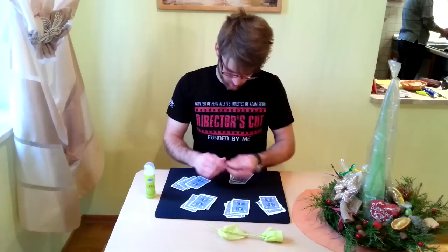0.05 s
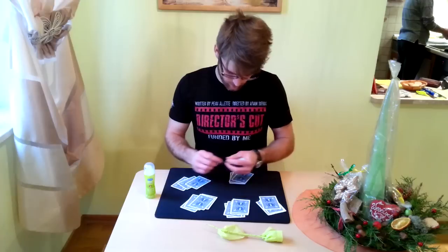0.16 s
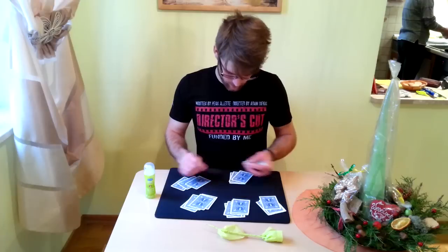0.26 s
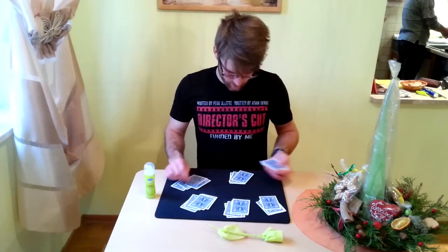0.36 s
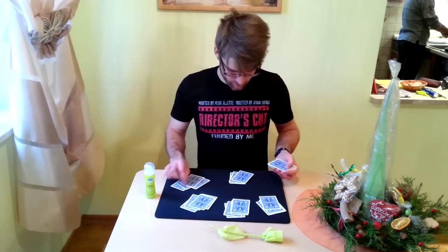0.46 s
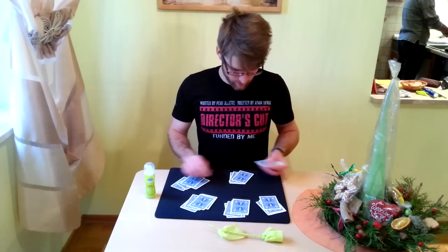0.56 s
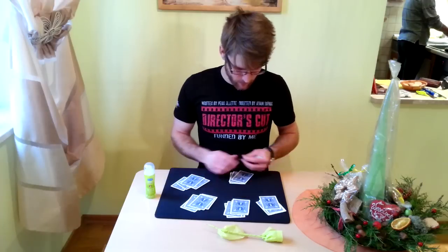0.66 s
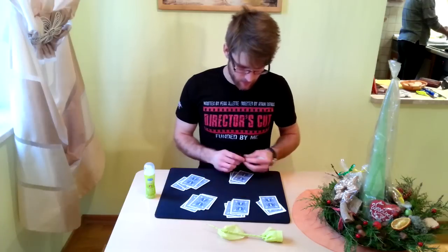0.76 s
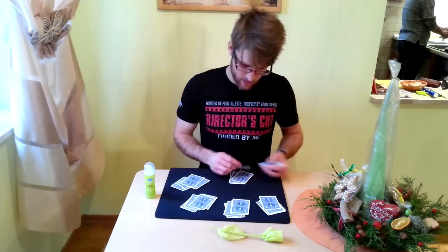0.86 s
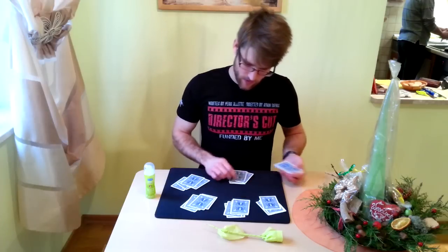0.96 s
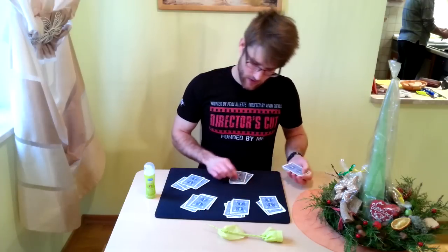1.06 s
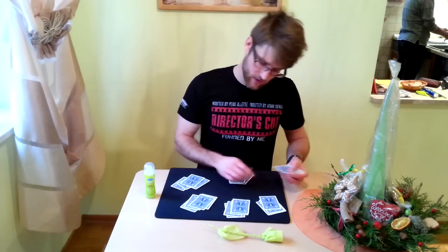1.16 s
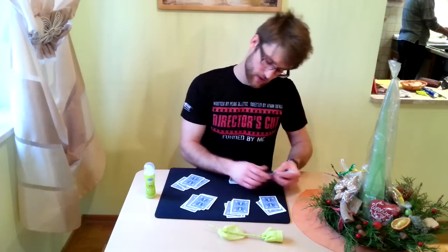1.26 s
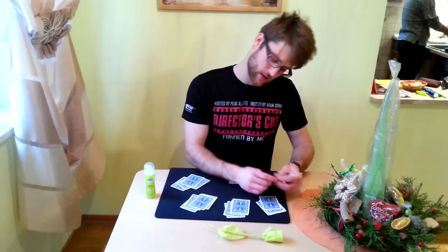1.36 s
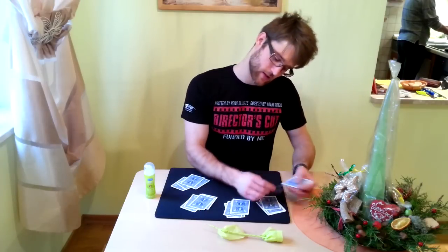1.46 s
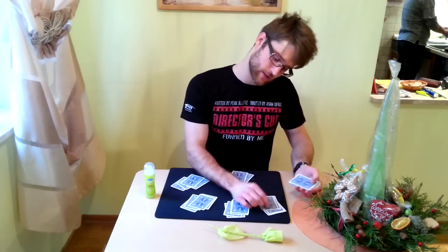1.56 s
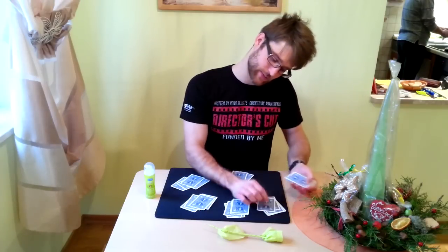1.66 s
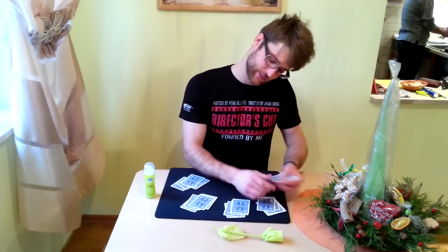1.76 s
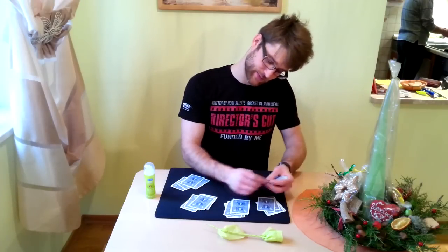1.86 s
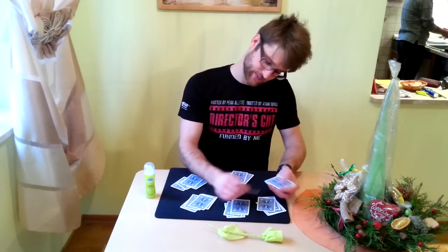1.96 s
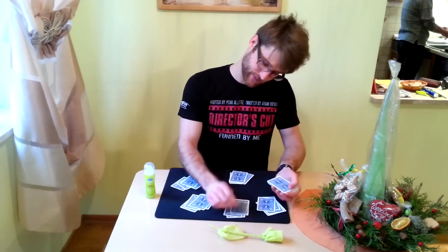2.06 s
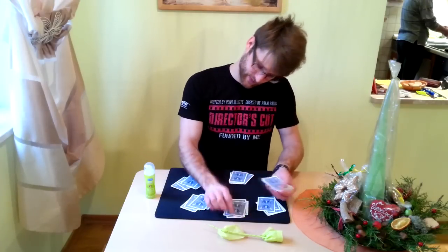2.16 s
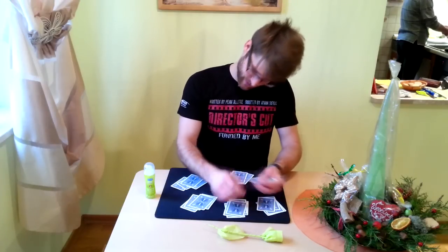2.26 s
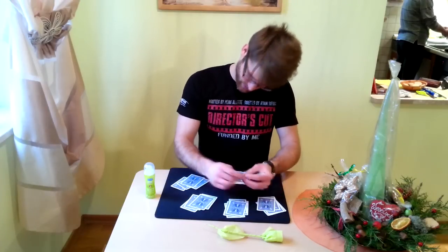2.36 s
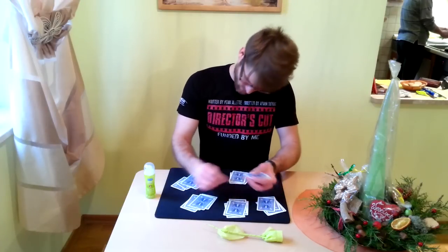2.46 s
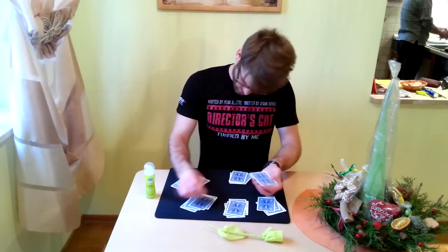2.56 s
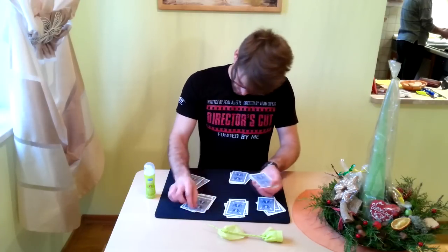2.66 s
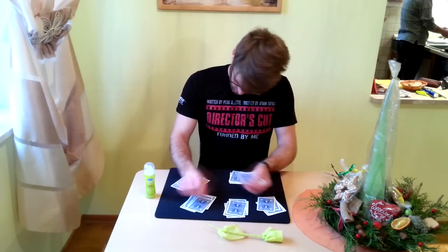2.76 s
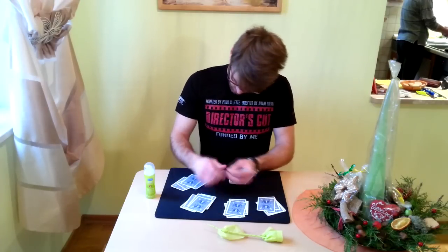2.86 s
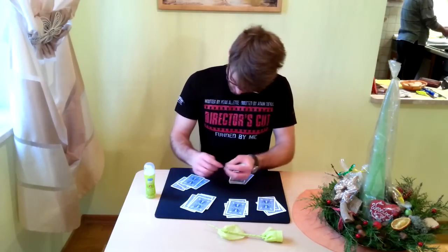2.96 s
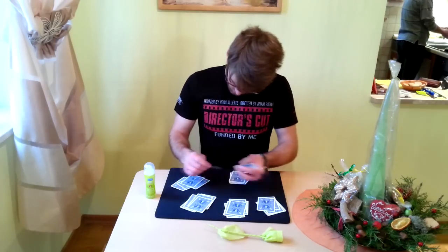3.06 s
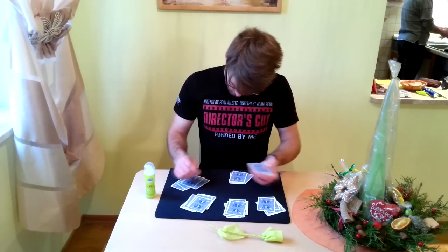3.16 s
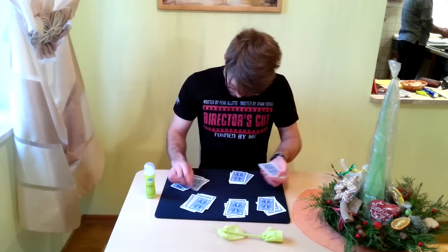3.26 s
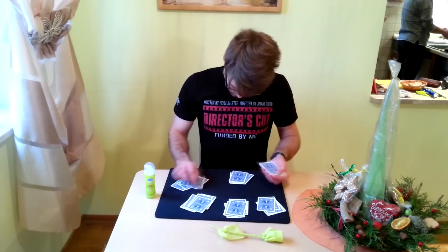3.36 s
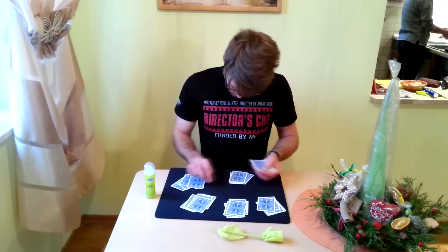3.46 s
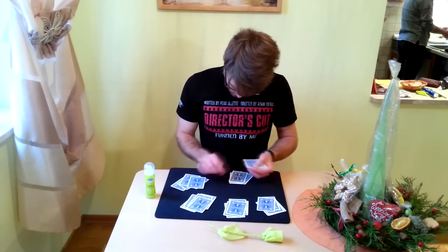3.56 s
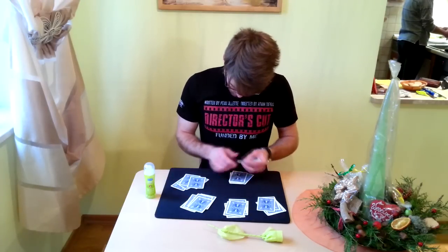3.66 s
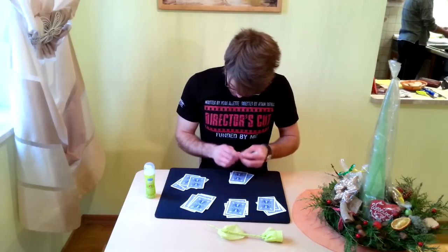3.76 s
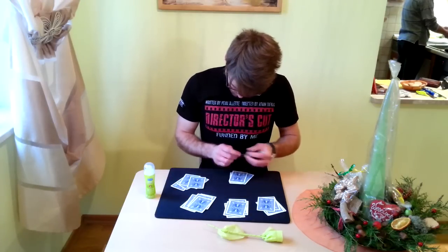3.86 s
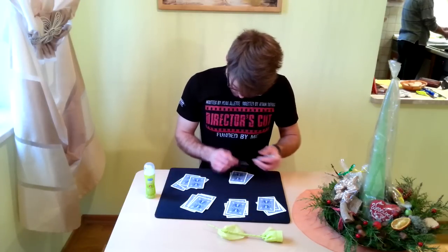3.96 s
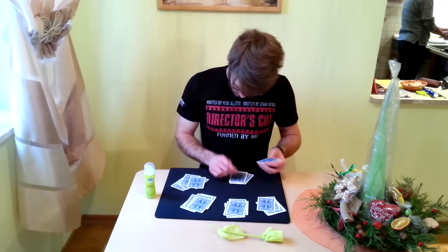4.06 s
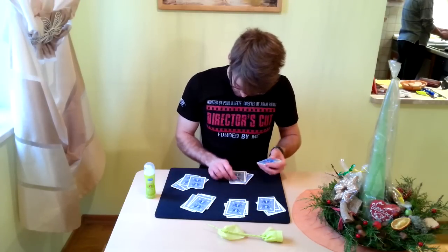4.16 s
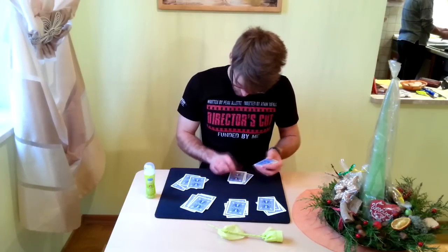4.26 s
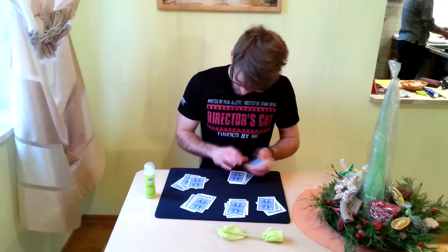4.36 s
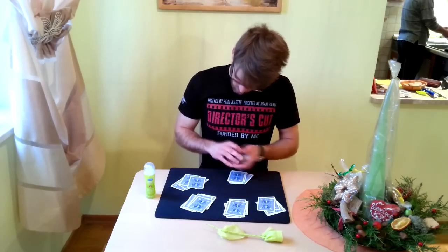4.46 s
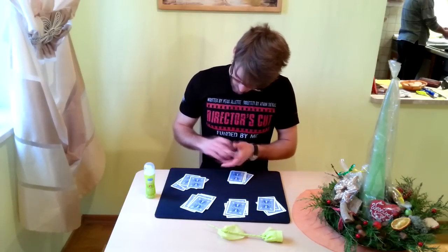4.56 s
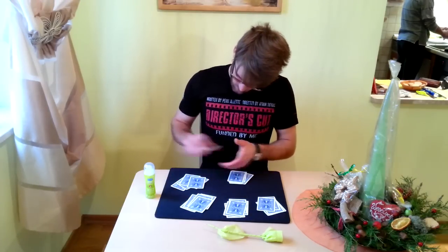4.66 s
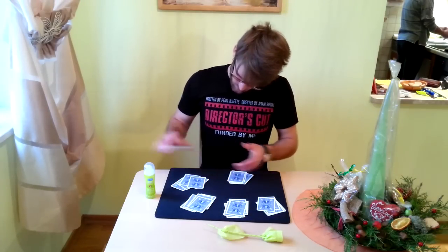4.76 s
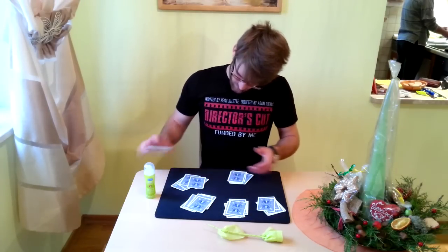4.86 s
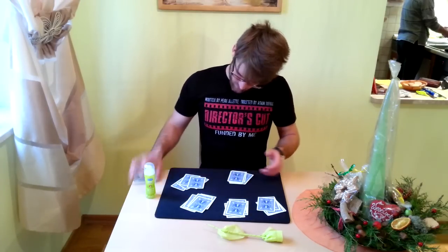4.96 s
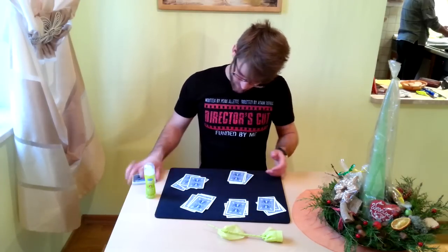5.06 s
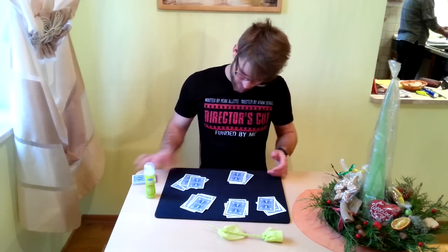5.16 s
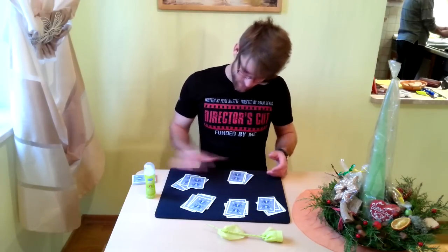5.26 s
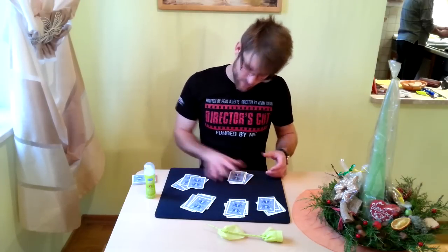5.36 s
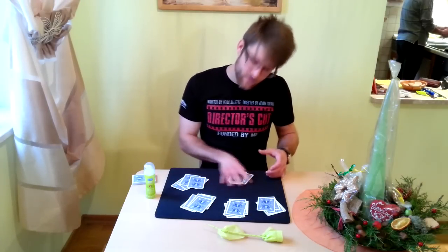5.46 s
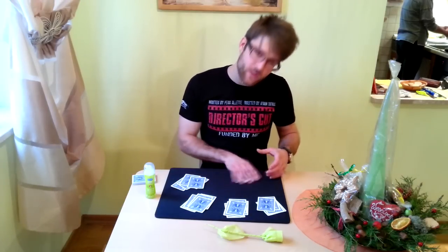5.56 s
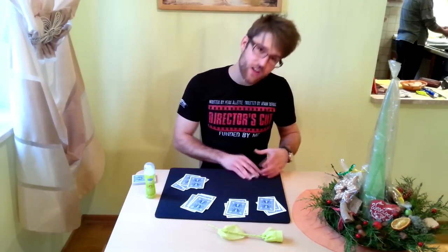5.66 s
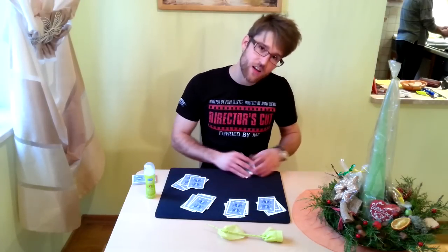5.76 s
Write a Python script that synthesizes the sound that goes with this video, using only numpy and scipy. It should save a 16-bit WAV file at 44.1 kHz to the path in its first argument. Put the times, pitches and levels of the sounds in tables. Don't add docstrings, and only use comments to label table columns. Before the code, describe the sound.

Someone deals playing cards onto a soft mat on a table, each landing with a short papery snap and sometimes a dull thud. Sliding cards and sleeves rustle faintly between deals. After the last crisp snap, the remaining deck is knocked on bare wood, by far the loudest sound, with a card slap and short ring. A spaced stereo microphone pair a few steps away hears a small, lively room.

```python
import sys
import numpy as np
from scipy import signal
from scipy.io import wavfile

SR = 44100
rng = np.random.default_rng(int(sys.argv[2]) if len(sys.argv) > 2 else 0)


def master_out(mix):
    frames = np.transpose(np.atleast_2d(mix))
    ceiling = np.clip(frames, -1, 1)
    pcm = np.round(ceiling * 32767).astype(np.int16)
    wavfile.write(sys.argv[1], SR, pcm)


def convert_level_to_amplitude(level_db):
    exponent = np.asarray(level_db, float) / 20
    return 10 ** exponent


N = 255778
PRE_S = 0.008

# (t/s, peak/dB, card pitch f/Hz, mat thud level/dB, edge crack level/dB)
SNAPS = [
    (0.4887, -33.5, 1204, -5.5, 5.5),
    (1.066, -25, 1400, -24, 5.5),
    (1.663, -23.5, 1415, -2, 2.5),
    (2.1993, -23.5, 1226, -44, 1),
    (2.7319, -33, 880, -3, 8.5),
    (3.453, -43.5, 1570, 2, -1),
    (3.463, -38, 1050, -2.5, 8),
    (3.494, -49, 1080, 1.5, 18),
    (4.2575, -23, 1320, -8, 6.5),
]


def rms_one(x):
    return x / np.sqrt(np.mean(x ** 2) + 1e-20)


def peak_one(x):
    return x / np.max(np.abs(x))


def at_hz(points, hz):
    points_hz, values = np.array(points)[:, 0], np.array(points)[:, 1]
    return np.interp(np.log(hz), np.log(points_hz), values)


def drift(rate_hz):
    knots = rng.standard_normal(int(N / SR * rate_hz) + 3)
    return np.interp(np.arange(N) / SR * rate_hz, np.arange(len(knots)), knots)


def peak(x, hz, width_hz):
    r = np.exp(-np.pi * np.clip(width_hz, 2, 9000) / SR)
    feedback = [1, -2 * r * np.cos(2 * np.pi * hz / SR), r * r]
    return signal.lfilter([(1 - r * r) / 2, 0, (r * r - 1) / 2], feedback, x)


def twice(x, hz, width_hz):
    return peak_one(peak(peak(x, hz, width_hz), hz, width_hz))


def bands(size):
    # (f/Hz, likeness)
    likeness = [(25, 0.34), (70, 0.16), (125, 0.41), (300, 0.58), (600, 0.64), (1200, 0.14), (15000, 0.089)]
    edges_hz = 20 * 2 ** np.arange(0, 9.7, .4)
    white = rng.standard_normal((2, 2, size))
    for k, (low, high) in enumerate(zip(edges_hz, edges_hz[1:])):
        band_pass = signal.butter(2, [low, high], "band", fs=SR, output="sos")
        mid, side = signal.sosfilt(band_pass, white[k % 2])
        hz = np.sqrt(low * high)
        alike = np.clip(at_hz(likeness, hz), -1, 1)
        common = np.sqrt(1 + alike) * mid
        opposed = np.sqrt(1 - alike) * side * [[1], [-1]]
        yield hz, (common + opposed) / np.sqrt(2)


def rustle(follows, settle_db, settle_db_per_s):
    # (t/s, level/dB)
    busy = [(0, -52), (.09, -65), (.45, -63.5), (.95, -58.5), (1.25, -62), (1.5, -57), (1.82, -51),
            (2.15, -55), (2.45, -56.5), (2.65, -62), (2.95, -57), (3.2, -66.5), (3.8, -66.5), (4.0, -58),
            (4.65, -61.5), (4.95, -67.5), (5.42, -63), (5.66, -52.5)]
    mean_busy_db = -62
    t = np.arange(N) / SR
    swing_db = np.interp(t, *np.transpose(busy)) - mean_busy_db
    power = convert_level_to_amplitude(mean_busy_db + follows * swing_db) ** 2
    for s, db, *_ in SNAPS:
        start = round(s * SR)
        power[start:] += convert_level_to_amplitude(db + settle_db - settle_db_per_s * (t[start:] - s)) ** 2
    return np.sqrt(power)


def background():
    # (f/Hz, level/dB per Hz)
    slide_spectrum = [(1200, -67.5), (2200, 0), (3200, -3), (4200, 1), (5500, -24.5), (7000, -18)]
    sleeve_spectrum = [(150, -6), (300, -2), (600, -1.5), (1200, -1), (2200, -5), (3500, -46.5)]
    hiss_spectrum = [(4000, -2), (6000, -1.5), (9000, 0.5), (14000, -7)]
    # (f/Hz, level/dB per Hz)
    air_spectrum = [(20, -14), (60, -17), (160, -6), (280, -4.5), (400, -12.5), (1000, -17.5), (5000, -32),
                    (15000, -23)]
    # (f/Hz, width/Hz, level/dB)
    hum = (249, 24, -71)
    air_db = -55.5
    slide = rustle(follows=0.95, settle_db=-13.5, settle_db_per_s=136)
    sleeve = rustle(follows=0.83, settle_db=-21, settle_db_per_s=70)
    hiss = rustle(follows=0.55, settle_db=-22.5, settle_db_per_s=118)
    out, together = 0, drift(42)
    for hz, noise in bands(N):
        moving = (slide * convert_level_to_amplitude(at_hz(slide_spectrum, hz) + 11.5)) ** 2
        moving = moving + (sleeve * convert_level_to_amplitude(at_hz(sleeve_spectrum, hz) + 13.5)) ** 2
        moving = moving + (hiss * convert_level_to_amplitude(at_hz(hiss_spectrum, hz) + 2.5)) ** 2 * (hz > 3000)
        moving = moving * convert_level_to_amplitude(2.0 * together + 4.6 * drift(15)) * (hz > 120)
        still = convert_level_to_amplitude(air_db + at_hz(air_spectrum, hz) + 17.5) ** 2
        out = out + noise * np.sqrt(moving + still)
    hz, width_hz, db = hum
    return out + convert_level_to_amplitude(db) * rms_one(peak(rng.standard_normal(N), hz, width_hz))


def burst(length_s, grain=0.23, lead_s=0.0054):
    t = np.arange(-PRE_S, .15, 1 / SR)
    grains = rng.standard_normal(len(t)) * convert_level_to_amplitude(4.0 * rng.standard_normal(len(t)))
    out = grain * grains * np.exp(np.where(t < 0, t / lead_s - .7, -t / max(length_s, 1e-4)))
    out[np.argmax(t >= 0)] = 1.5
    return out


def add(track, s, sound):
    i = round((s - PRE_S) * SR)
    track[..., i:i + sound.shape[-1]] += sound[..., :N - i]


def touches():
    # (t/s, peak/dB, f/Hz,
    # length/s)
    edge_catches = [(0.386, -49.5, 604, .002), (0.701, -49.5, 3770, .006), (0.707, -49, 1640, 0.0037),
                    (0.767, -43, 3700, 0.0071), (.9792, -44.5, 2760, 0.0018), (1.594, -51.5, 446, 0.0041),
                    (2.1, -53.5, 840, 0.0056), (2.526, -48, 1050, .0034), (2.67, -58, 890, .0036),
                    (2.735, -49.5, 297, 0.039), (4.2578, -31, 2640, 0.0047), (3.464, -55, 330, 0.0043),
                    (3.896, -45, 3860, 0.025), (4.115, -56, 1410, .0036), (4.26, -34, 790, 0.0098),
                    (4.623, -50.5, 8500, 0.017), (4.683, -40, 3780, 0.0025)]
    # (t/s, peak/dB, centre f/Hz, length/s)
    face_brushes = [(.257, -51, 530, 0.0093), (.408, -58.5, 466, 0.013), (1.665, -30.5, 2640, 0.014),
                    (2.423, -46, 2500, 0.012), (2.5262, -41, 2640, 0.0017), (2.738, -33, 3450, 0.034),
                    (3.002, -55, 1800, .003), (3.019, -43, 1250, 0.012), (3.03, -44.5, 3420, 0.029),
                    (3.281, -47, 1820, 0.0035), (4.562, -44.5, 2800, 0.0076), (5.585, -52, 9050, .002),
                    (5.707, -42, 5400, 0.0016)]
    out = np.zeros(N)
    for rows, width_share in ((edge_catches, .42), (face_brushes, 1.47)):
        for s, db, hz, length_s in rows:
            hit = burst(length_s, grain=.1, lead_s=.0003)
            scuff = twice(hit, hz, width_share * hz)
            tick_db = -9 + 7.5 * np.log2(hz / 2000)
            tick = peak_one(peak(hit, 4800, 9900))
            add(out, s, convert_level_to_amplitude(db) * (scuff + convert_level_to_amplitude(tick_db) * tick))
    return out


def snaps():
    out = np.zeros(N)
    for s, db, hz, thud_db, crack_db in SNAPS:
        hit = burst(0.0015, grain=.09, lead_s=.0012)
        thud_hz = 0.57 * hz
        crack = peak_one(peak(hit, 2590, 3600) + 0.14 * peak(hit, 8200, 8900))
        card = peak_one(peak(twice(hit, hz, 0.86 * hz), hz, 2.2 * hz))
        thud = twice(hit, thud_hz, 1.53 * thud_hz)
        add(out, s, convert_level_to_amplitude(db) * (card + convert_level_to_amplitude(thud_db) * thud + convert_level_to_amplitude(crack_db) * crack))
    left_right_db = np.array([[-.1], [.1]])
    return out * convert_level_to_amplitude(left_right_db)


def knock():
    # (t/s, wood level/dB, card slap level/dB, length/s)
    contacts = [
        (5.0603, -35, -21, 0.0036),
        (5.0679, -20.5, 0, 0.01),
        (5.0741, -5.5, -38, 0.0058),
        (5.082, -13.5, -20, 0.028),
        (5.179, -26.5, -62, 0.034),
        (5.285, -35, -37, 0.033),
    ]
    # (f/Hz, level/dB, t60/s)
    table_modes = [(172, 4, 0.083), (250.8, -9, 0.42), (299.4, -6, 0.31), (362, -8, 0.17), (408.4, 4, 0.2),
                   (463, -8, 0.18), (488, 10, 0.18), (547, 9.5, 0.05), (750, 4.5, 0.1), (869, 9, 0.064),
                   (980, 20.5, 0.025), (1060, -6, 0.031), (1320, -5, 0.03), (1950, 8, 0.028)]
    # (f/Hz, width/Hz, level/dB)
    deck_modes = [(3470, 1100, 0), (4100, 250, 6), (1050, 1200, 5.5), (2500, 1400, -5), (7100, 790, -11.5),
                  (9900, 1400, -18)]
    # (f/Hz, width/Hz, share lost)
    shadow = (8400, 11000, 1)
    wood, slap = np.zeros((2, N)), np.zeros(N)
    lags = (rng.random(len(table_modes)) * 12).astype(int)
    leans_db = 2.0 * rng.standard_normal(len(table_modes))
    for s, wood_db, slap_db, length_s in contacts:
        hit = np.pad(burst(length_s, grain=0.4, lead_s=0.00041), (0, SR // 2))
        modes = [convert_level_to_amplitude(db) * t60 * peak(hit, hz, 2.2 / t60) for hz, db, t60 in table_modes]
        left = sum(modes)
        right = sum(convert_level_to_amplitude(lean) * np.roll(mode, lag) for mode, lag, lean in zip(modes, lags, leans_db))
        add(wood, s, convert_level_to_amplitude(wood_db) * peak_one(np.array([left, right])))
        cards = sum(convert_level_to_amplitude(db) * peak(hit, hz, width_hz) for hz, width_hz, db in deck_modes)
        add(slap, s, convert_level_to_amplitude(slap_db) * peak_one(cards))
    hz, width_hz, share = shadow
    return wood, np.array([slap - share * peak(slap, hz, width_hz), slap])


def room(x):
    # (f/Hz, t60/s)
    tail_t60 = [(100, 0.66), (300, 0.64), (1000, 0.54), (3000, 0.54), (6000, 0.38), (12000, 0.28)]
    # (f/Hz, level/dB)
    tail_db = [(100, -27.5), (500, -20), (2000, -24.5), (6000, -23.5), (14000, -27.5)]
    # (t/s, left level/dB, right level/dB)
    wall_echoes = [
        (.0047, -2, -1),
        (.0078, -9, -8),
        (.0135, -10, -11),
    ]
    # (level/dB, t60/s)
    early = (5, .08)
    direct_db = 4
    t = np.arange(SR) / SR
    early_db, early_t60_s = early
    rise = np.clip((t - .002) / 0.0016, 0, 1) * (1 + convert_level_to_amplitude(early_db - 60 * t / early_t60_s))
    response = np.zeros((2, SR))
    for hz, noise in bands(SR):
        response += convert_level_to_amplitude(at_hz(tail_db, hz) - 60 * t / at_hz(tail_t60, hz)) * rise * noise
    echoes = np.zeros((2, SR))
    for s, left_db, right_db in wall_echoes:
        echoes[0, round(s * SR)] = -convert_level_to_amplitude(left_db)
        echoes[1, round(s * SR * .94)] = -convert_level_to_amplitude(right_db)
    response += signal.lfilter([.5], [1, -.5], echoes)
    response[0, 1] = response[1, 0] = convert_level_to_amplitude(direct_db)
    return signal.fftconvolve(x, response, axes=1)[:, :N]


def scene():
    wood, slap = knock()
    table = snaps() + touches() + slap + convert_level_to_amplitude(-5.0) * wood
    bass_cut = signal.butter(6, 120, "high", fs=SR, output="sos")
    return signal.sosfilt(bass_cut, room(table) + convert_level_to_amplitude(12) * wood) + background()


def low_pass(x):
    return signal.sosfilt(signal.butter(12, 15900, fs=SR, output="sos"), x)


def record(dry):
    t = np.arange(N) / SR
    over_db = np.maximum(20 * np.log10(np.max(np.abs(dry), axis=0) + 1e-9) + 6, 0)
    held_db = np.maximum.accumulate(over_db + 40 * t) - 40 * t
    held_db = signal.lfilter([.02], [1, -.98], held_db)
    held = dry * convert_level_to_amplitude(-.5 * held_db)
    rounded = .95 * np.tanh(held / .95)
    top_cut = signal.cheby2(14, 38, 14950, fs=SR, output="sos")
    return low_pass(signal.sosfilt(top_cut, rounded))


dry = scene()
out = record(dry)
master_out(out)
```